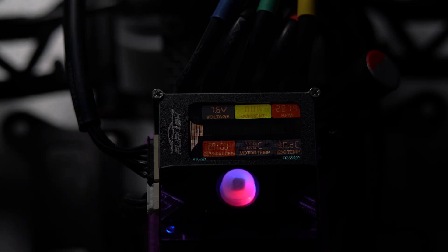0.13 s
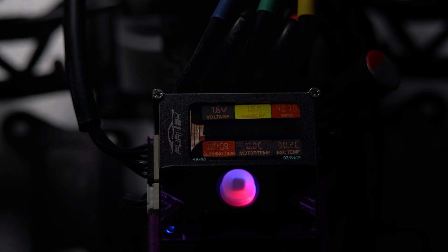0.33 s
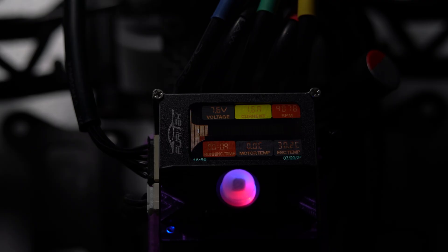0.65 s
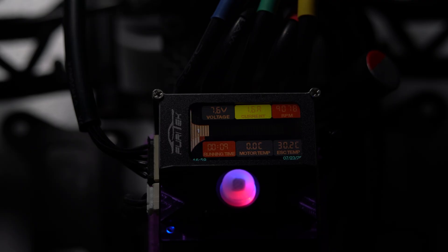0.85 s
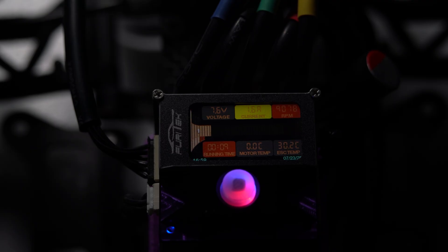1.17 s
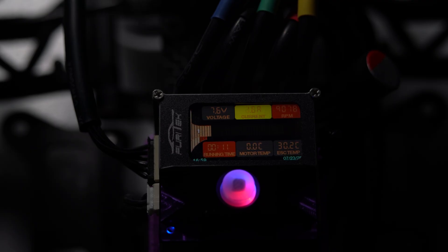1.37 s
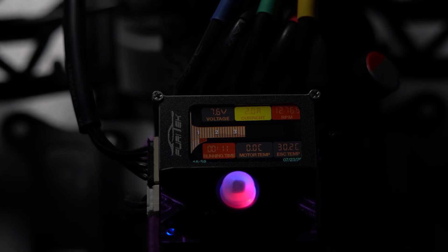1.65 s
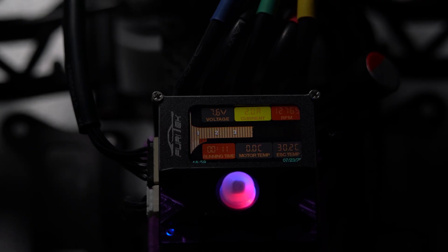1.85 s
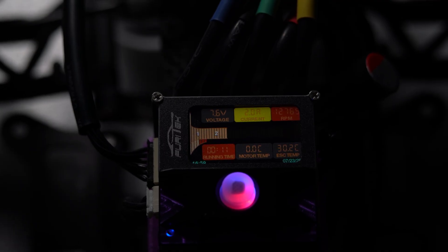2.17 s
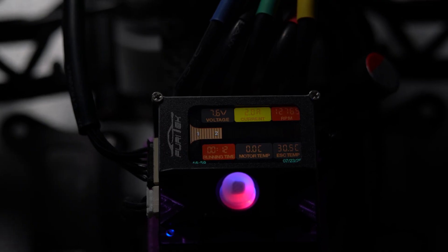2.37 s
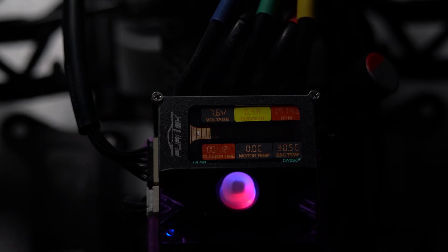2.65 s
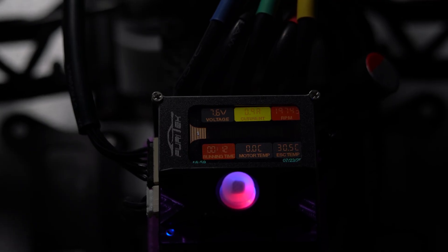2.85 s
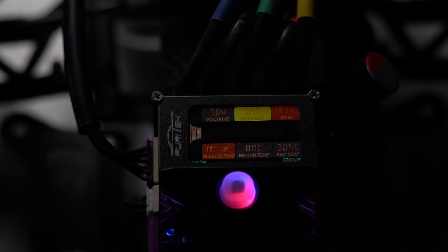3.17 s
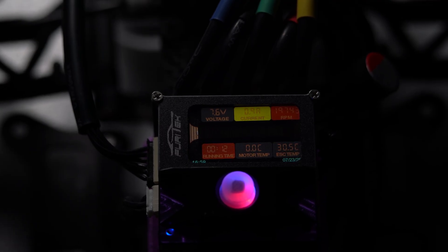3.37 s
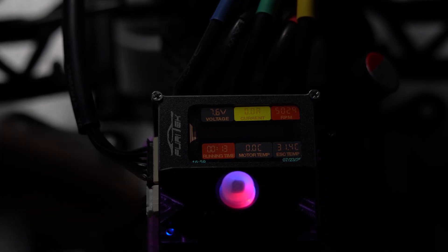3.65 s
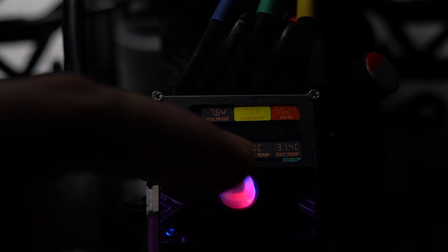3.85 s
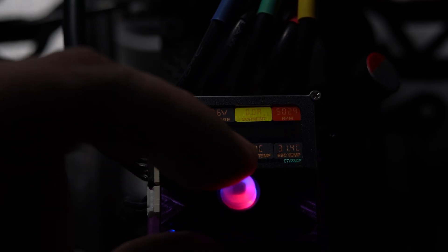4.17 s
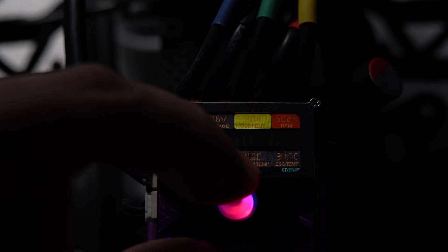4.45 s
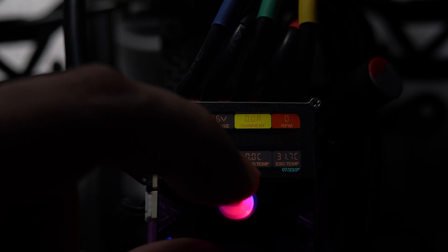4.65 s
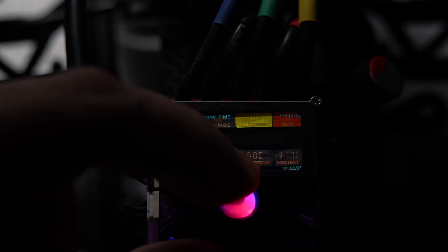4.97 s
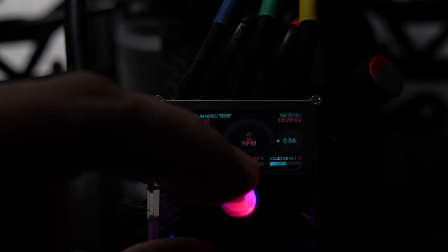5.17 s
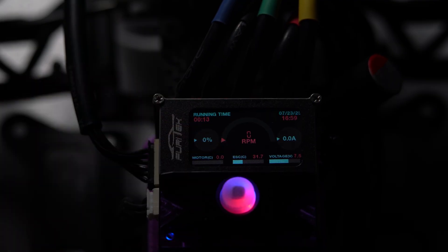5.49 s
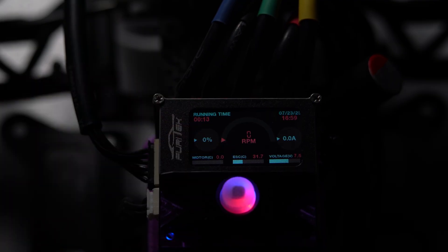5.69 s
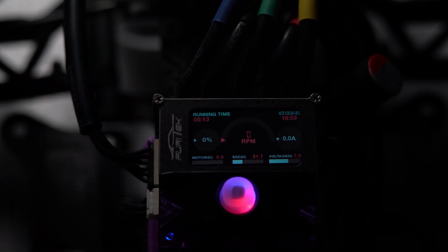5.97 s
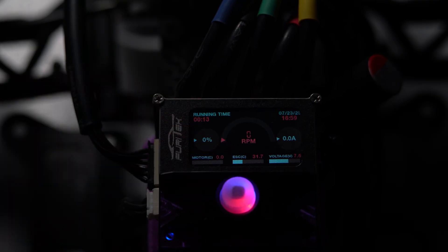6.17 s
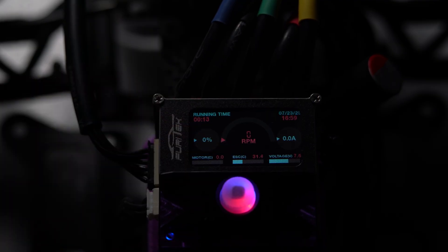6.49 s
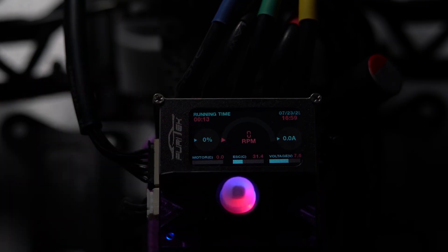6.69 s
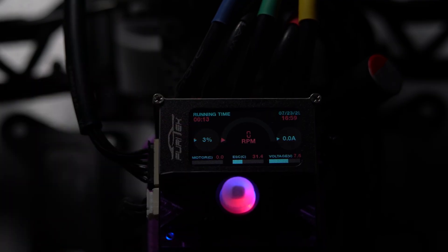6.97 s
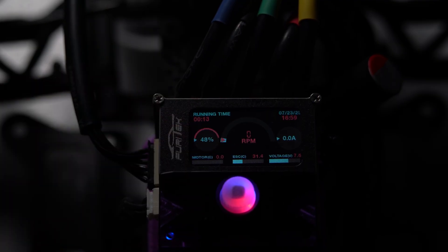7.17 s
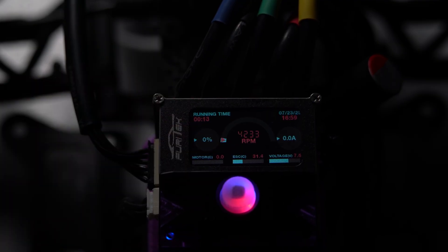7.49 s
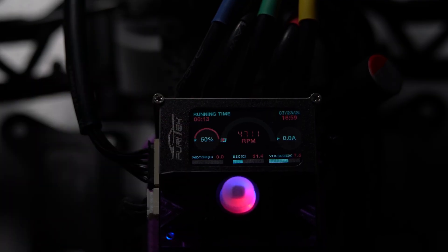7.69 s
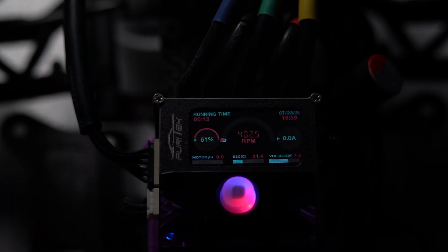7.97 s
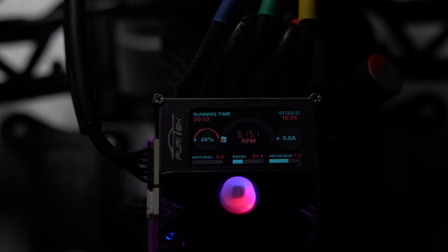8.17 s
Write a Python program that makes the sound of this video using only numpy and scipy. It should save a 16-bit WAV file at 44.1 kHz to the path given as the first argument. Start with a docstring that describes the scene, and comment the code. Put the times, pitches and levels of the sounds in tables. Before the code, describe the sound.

Rattling gears and a small electric motor creep, rev and wind down, followed by faint cooling fan whir and four short whining bursts.

```python
"""A model car's gears chatter on a bench, close to a stereo microphone: its brushless motor creeps up,
revs to a whine and coasts to rest. A tiny cooling fan hisses and whistles while a finger presses the
speed controller; then come four short blips of throttle. Loose gear teeth rattle through the resonances
of gearbox and chassis, and the motor's hum and whine follow multiples (orders) of the shaft speed."""
import sys
import numpy as np
from scipy import signal
from scipy.fft import rfft, irfft, next_fast_len
from scipy.io import wavfile
from scipy.ndimage import uniform_filter1d, map_coordinates

SR = 44100
rng = np.random.default_rng(int(sys.argv[2]) if len(sys.argv) > 2 else 0)


def wrap_up_sound(samples):
    """Save the sound to the file named by the first command line argument, as 16-bit audio."""
    columns = np.atleast_2d(samples).T
    # keep every value between -1 and 1, then stretch to whole-number steps
    tamed = np.clip(columns, -1, 1)
    steps = np.round(tamed * 32767).astype(np.int16)
    wavfile.write(sys.argv[1], SR, steps)


N = 367794
TIME = np.arange(N) / SR
BASS_EDGE_HZ, TOP_HZ = 136, 15780  # so small a car radiates little below the bass edge

# The motor creeps, revs and is braked. Each row: time in seconds, shaft speed in turns a second.
FIRST_RUN = [(0.0, 135.3), (0.08, 135.3), (0.24, 156.0), (0.45, 155.0), (0.59, 173.4), (0.89, 202.0),
             (1.06, 203.3), (1.27, 225.9), (1.33, 253.5), (1.38, 254), (1.42, 272), (1.46, 325),
             (1.53, 525.7), (1.58, 582.7), (1.68, 632.1), (1.81, 653.4), (2.02, 655.6), (2.06, 530),
             (2.1, 415), (2.14, 357), (2.18, 342.9)]
# Blips of throttle. Each row: start and length in seconds, turns a second asked for during the blip
# and after it, load on the gears.
THROTTLE_BLIPS = [(7.053, 0.19, 204, 110, 0.63), (7.549, 0.14, 208, 115, 0.66), (7.9, 0.18, 212, 120, 0.81),
                  (8.261, 0.14, 223, 124, 0.61)]
# How the gears' highest band follows the shaft. A level law lists: dB at full speed, full speed in turns
# a second, dB lost per halving of speed, floor in dB, dB added by load in the creep and in the blips.
SIZZLE_LAW = (-23.5, 405, 11.5, -50.5, 15, 8.5)


def amp(db):
    """Decibels to gain."""
    return 10 ** (np.asarray(db) / 20)


def unit(x):
    """Scale to rms 1."""
    return x / np.sqrt(np.mean(x ** 2) + 1e-20)


def along(points, hz):
    """Interpolate (Hz, value) points on a log axis."""
    freqs, values = np.transpose(points)
    return np.interp(np.log(hz + 1), np.log(freqs + 1), values)


def curves(table):
    """One value per sample for each column after the time."""
    times, *columns = np.transpose(table)
    return [np.interp(TIME, times, column) for column in columns]


def swells(table):
    """Smooth bumps of gain from rows of peak time in seconds, dB, half length in seconds."""
    return sum(amp(db) * np.exp(-.5 * ((TIME - s) / half) ** 2) for s, db, half in table)


def wobble(rate):
    """A smooth random curve, rate knots a second."""
    return map_coordinates(rng.standard_normal(int(N * rate / SR) + 4), [TIME * rate])


def lag(x, lag_s):
    """x followed sluggishly, as by a mass."""
    step = 1 / (lag_s * SR)
    return signal.lfilter([step], [1, step - 1], x)


def filtered(x, response):
    """x through a frequency response."""
    size = next_fast_len(N + SR // 4)
    return irfft(rfft(x, size) * response(np.fft.rfftfreq(size, 1 / SR)), size)[..., :N]


def above(hz, edge_hz):
    """A steep high-pass gain."""
    return np.sqrt(1 - 1 / (1 + (hz / edge_hz) ** 12))


def peak(hz, centre_hz, width_hz):
    """One resonance of height 1."""
    return 1 / (1 + (2 * (hz - centre_hz) / width_hz) ** 2)


def resonances(modes, hz):
    """Gain of (Hz, width Hz, dB) peaks with nothing between them."""
    return sum(amp(db) * peak(hz, centre, width) for centre, width, db in modes)


def lifts(modes, hz):
    """Gain of (Hz, width Hz, dB lift) peaks on a flat response."""
    return amp(sum(db * peak(hz, centre, width) for centre, width, db in modes))


def noise(response):
    """Unrelated mid and side noises of rms 1, coloured by a frequency response."""
    return unit(filtered(rng.standard_normal((2, N)), response))


def rush(spectrum):
    """Noise with a (Hz, dB) spectrum."""
    return noise(lambda hz: amp(along(spectrum, hz)))


def ringing(modes):
    """Noise in (Hz, width Hz, dB) resonances."""
    return noise(lambda hz: resonances(modes, hz))


def partial(angle, flutter_db, rate):
    """A fluttering tone of rms 1, a quarter cycle apart in mid and side."""
    phase = angle + rng.uniform(0, 2 * np.pi)
    return unit(amp(flutter_db * wobble(rate)) * np.array([np.sin(phase), np.cos(phase)]))


def shaft_tones(orders, angle, jitter_rad, jitter_rate, flutter_rate):
    """Tones locked to the shaft by (order, dB) rows, each with its own phase jitter."""
    return sum(amp(db) * partial(order * angle + jitter_rad * wobble(jitter_rate), 3, flutter_rate)
               for order, db in orders)


def body(hz):
    """Gain of the gearbox and chassis."""
    # The broad shape. Each row: frequency in Hz, gain in dB.
    shape = [(30, -49), (100, -39), (230, -26), (560, -20.5), (1100, -26), (1850, -13.5), (2350, -10),
             (3050, -3), (3550, 6.5), (4000, 6.5), (5200, 4), (7300, 3.5), (10500, -5.5), (12500, -6),
             (15600, -13)]
    # The resonances. Each row: centre and width in Hz, lift in dB.
    modes = [(333, 5.3, 12), (427, 18, 13), (669, 48, 7.5), (761, 45, 14), (918, 71, 13.5), (1005, 82, 14),
             (1115, 43, 11), (1214, 130, 8), (1325, 52, 5), (1420, 74, 7.5), (1475, 19, 5), (1633, 67, 5),
             (2065, 42, 4.5), (2100, 100, 2.5), (2221, 64, 10), (2416, 27, 6), (2664, 170, 5.5),
             (4164, 22, 8), (5780, 240, 4.5), (6450, 210, 6), (7330, 1400, 6), (8790, 100, 7.5),
             (9200, 120, 1.5)]
    return amp(along(shape, hz)) * lifts(modes, hz)


def frame_ring(x, t60, ring_db):
    """Countless small parts of the frame ring on after each contact."""
    t = np.arange(SR // 4) / SR
    tail = rng.standard_normal((2, len(t))) * amp(-60 * t / t60)
    echo = signal.fftconvolve(x, tail / np.linalg.norm(tail[0]), axes=1)[:, :N]
    return x + amp(ring_db) * filtered(echo, lambda hz: above(hz, edge_hz=980))


def turning(speed, slowest=12):
    """A gain that fades to silence below the slowest speed, in turns a second."""
    return np.clip(speed / slowest, 0, 1) ** 2


def acceleration(speed):
    """Smoothed change of speed, in turns a second per second."""
    return uniform_filter1d(np.gradient(speed) * SR, size=2000)


def strength(law, speed, loads):
    """Gain from a level law: it grows with speed up to a limit, and with chatter under load."""
    full_db, full_speed, halving_db, floor_db, creep_db, blip_db = law
    halvings = np.maximum(np.log2(full_speed / (speed + 1)), 0)
    free_db = np.maximum(full_db - halving_db * halvings, floor_db)
    return turning(speed) * amp(free_db + creep_db * loads[0] + blip_db * loads[1])


def shaft(stick_speed=11, chatter_speed=139, smooth_speed=354, trigger_s=.02, inertia_s=.065):
    """Shaft speed in turns a second, and the chattering load in the creep and in the blips."""
    friction, drag = 106, .6  # lost each second: turns a second, share of the speed
    release_s, release_speed = FIRST_RUN[-1]
    coast = (release_speed + friction / drag) * np.exp(-drag * (TIME - release_s)) - friction / drag
    driven = TIME < release_s
    run = uniform_filter1d(np.where(driven, curves(FIRST_RUN)[0], coast * (coast > stick_speed)), 900)
    asked, load = np.zeros((2, N))
    for s, length, top, after, blip_load in THROTTLE_BLIPS:
        asked = np.where(TIME < s, asked, np.where(TIME < s + length, top, after))
        load = np.where(TIME < s, load, blip_load)
    # the throttle lags behind the finger, the shaft behind the throttle
    blips = lag(lag(asked, trigger_s), inertia_s)
    # a kick only bites once the shaft is under way
    kick = np.clip(1 - blips / (asked + 1), 0, 1) * turning(blips, slowest=210)
    speed = np.abs(run + blips)
    chatter = np.clip((smooth_speed - speed) / (smooth_speed - chatter_speed), 0, 1)
    return speed, chatter * lag(np.array([driven, load + kick]), lag_s=0.00081)


def fan(swell_start_s=4.48, hiss_db_per_s=3.5, low_db_per_s=2.5):
    """The cooling fan's hiss and thin drifting whistle, heard louder in the second half."""
    # The whistle. Each row: time in seconds, pitch in Hz, level in dB.
    whistle_path = [(3.0, 3168, -68), (3.9, 3168, -57), (4.37, 3176, -63), (4.7, 3208, -54.5),
                    (4.96, 3229, -50.5), (5.15, 3233, -50.5), (5.38, 3237, -47), (5.52, 3245, -56),
                    (5.63, 3260, -52), (5.73, 3276, -56), (5.92, 3305, -53), (6.05, 3322, -58),
                    (6.25, 3358, -53), (6.42, 3375, -55), (6.6, 3380, -51.5), (7.04, 3368, -56.5)]
    # Its overtones swell in the housing. Each row: level in dB, resonance and width in Hz, lift in dB.
    overtones = [(-66, 6380, 110, 12), (-68, 9670, 160, 12)]
    # The hiss and the low rush of air. Each row: frequency in Hz, relative level in dB.
    hiss_spectrum = [(880, -48), (1500, -27), (2220, -10.5), (3080, -15.5), (3270, -10.5), (3570, -5),
                     (3880, -3), (4150, -1.5), (4550, -0.5), (4850, -4.5), (5400, -5.5), (6200, -8),
                     (7260, -4.5), (8660, -10), (9750, -8), (12100, -14), (13600, -9.5), (15800, -15)]
    low_spectrum = [(15, -64), (25, -36), (70, -31), (96, -31), (129, -12.5), (221, -16.5), (294, -6),
                    (417, -9.5), (772, -6), (1200, -7), (2500, -5.5), (3250, -6.5), (5500, -120)]
    swell_s = np.maximum(TIME - swell_start_s, 0)
    pitch, whistle_db = curves(whistle_path)
    angle = 2 * np.pi * np.cumsum(pitch + 2 * wobble(25)) / SR
    overtones_db = [db + lift * peak(k * pitch, hz, width)
                    for k, (db, hz, width, lift) in enumerate(overtones, 2)]
    # the whistle wavers more toward the end
    whistle = sum(amp(db) * partial(k * angle, flutter_db=1.2 + swell_s, rate=16)
                  for k, db in enumerate([whistle_db] + overtones_db, 1))
    air = unit(frame_ring(rush(hiss_spectrum), t60=0.11, ring_db=-4.5)) * amp(0.49 * wobble(50))
    hiss = amp(-45.5 + hiss_db_per_s * swell_s) * air
    low_air = amp(-59.5 + low_db_per_s * swell_s) * rush(low_spectrum)
    return hiss + low_air + whistle


def finger(boom_hz=420, width_hz=90):
    """A fingertip rubs on the controller, and the chassis booms softly under it."""
    # Each row: peak time in seconds, level in dB, half length in seconds, boom against the rub in dB.
    presses = [(4.444, -52.5, 0.017, -26), (4.675, -56, 0.094, -5.5), (5.067, -55.5, 0.1, -4.5)]
    # Rubbing skin. Each row: frequency in Hz, relative level in dB.
    skin_spectrum = [(25, -65), (100, -22), (300, -6.5), (900, -1), (1700, 0), (3000, -4), (8000, -32)]
    skin = rush(skin_spectrum)
    boom = unit(filtered(rush(skin_spectrum), lambda hz: peak(hz, boom_hz, width_hz)))
    rubs = sum(swells([bump]) * (skin + amp(boom_db) * boom) for *bump, boom_db in presses)
    return rubs * amp(1.1 * wobble(60))


def rocking(speed, angle, sway_hz=200, width_hz=170):
    """The magnets tug twice and four times a turn; the chassis sways when either meets its own note."""
    twice, four_times = (partial(order * angle, flutter_db=2, rate=20) for order in (2, 4))
    tugs = amp(-65) * turning(speed) * (twice + amp(-10) * four_times)
    return filtered(tugs, lambda hz: above(hz, BASS_EDGE_HZ) * peak(hz, sway_hz, width_hz))


def jolts():
    """A sudden change of torque makes the chassis ring and boom."""
    # Each row: peak time and half length in seconds, ring and boom levels in dB.
    shudders = [(2.09, 0.035, -56, -48), (3.68, 0.04, -60, -61), (3.823, 0.06, -61, -60),
                (7.14, 0.04, -45, -66), (7.61, 0.025, -39, -66)]
    # Chassis resonances. Each row: centre and width in Hz, relative level in dB.
    ring_modes = [(950, 110, 0), (1450, 110, -12)]
    boom_modes = [(150, 43, -12), (337, 30, -6.5), (434, 56, 1), (760, 46, -1)]
    rings = swells([(s, ring_db, half) for s, half, ring_db, _ in shudders])
    booms = swells([(s, boom_db, half) for s, half, _, boom_db in shudders])
    return rings * ringing(ring_modes) + booms * ringing(boom_modes)


def rubbing(rough_db=2.5):
    """The slow drivetrain rubs in ringing swells, and its slack teeth rattle just before it stops."""
    # Rubs and last rattle. Each row: peak time in seconds, level in dB, half length in seconds.
    scrapes = [(0.12, -33.5, 0.15), (2.58, -51, .05), (2.83, -38, 0.075), (3.134, -40.5, 0.095),
               (3.323, -44, 0.066), (3.53, -47, 0.089), (7.3, -38, 0.087), (7.71, -38, 0.06),
               (8.05, -36, 0.08), (8.32, -34, 0.03)]
    last_turns = [(3.77, -50, 0.06)]
    # Their resonances. Each row: centre and width in Hz, relative level in dB.
    scrape_modes = [(2237, 124, -3), (2700, 74, -10), (3830, 310, -8.5), (4190, 120, -6.5)]
    slack_modes = [(2820, 330, -1), (3550, 80, -2), (3740, 90, 0)]
    rubs = swells(scrapes) * ringing(scrape_modes) + swells(last_turns) * ringing(slack_modes)
    return rubs * unit(amp(rough_db * wobble(90)))


def coasting(speed, angle, release_db=-35, halving_db=13):
    """Freewheeling gears sing in whines that flare as they fall through the gear case's resonances."""
    # The whines. Each row: shaft order, relative level in dB.
    orders = [(7, -2), (8, -3), (11, 3), (13, -3), (15, 6), (17, -2)]
    # The gear case. Each row: centre and width in Hz, gain in dB.
    case_modes = [(2170, 200, -3.5), (3730, 260, 0), (4150, 240, -4.5)]
    release_s, release_speed = FIRST_RUN[-1]
    free = np.clip((TIME - release_s) / .04 + 2.5, 0, 1) * (TIME < THROTTLE_BLIPS[0][0])
    level = free * turning(speed) * amp(release_db - halving_db * np.log2(release_speed / (speed + 1)))
    whines = shaft_tones(orders, angle, jitter_rad=.45, jitter_rate=120, flutter_rate=50)
    return filtered(level * whines, lambda hz: resonances(case_modes, hz))


def tinks(speed, loads, tinks_per_s=14, t60=0.031):
    """The chatter shakes a small loose steel part, which rings briefly and very high."""
    # The loudest tinks; lesser ones fall at random. Each row: start in seconds, level in dB.
    loudest = [(0.277, -22), (0.333, -23), (0.443, -21), (0.468, -18), (7.602, -26), (7.695, -20),
               (7.79, -31), (7.908, -26), (8.053, -24), (8.313, -23)]
    # The steel's modes. Each row: frequency in Hz, relative level in dB.
    steel_modes = [(11250, -1), (11900, 0), (12350, -3), (12800, -2), (13300, -15)]
    shaken = (rng.random(N) < tinks_per_s / SR) * loads.sum(axis=0)
    shaken *= strength(SIZZLE_LAW, speed, loads) * amp(2 + 2 * rng.standard_normal(N))
    for s, db in loudest:
        shaken[round(s * SR)] = amp(db)
    t = np.arange(SR // 20) / SR
    out = np.zeros((2, N + len(t)))
    for start in np.flatnonzero(shaken > amp(-50)):
        tink = sum(amp(db + rng.normal(0, 3))
                   * np.sin(2 * np.pi * (hz * rng.normal(1, .008) * t + rng.random((2, 1))))
                   for hz, db in steel_modes)
        out[:, start:start + len(t)] += shaken[start] * unit(tink) * amp(-60 * t / t60)
    return out[:, :N]


def judder(speed, loads, creep_db=-38.5, blip_db=-31.5, rough_db=2.5):
    """Loaded at low speed, the drivetrain gives a rough, ringing rasp."""
    # Its resonances. Each row: centre and width in Hz, relative level in dB.
    modes = [(960, 90, -10.5), (2110, 70, -8), (2245, 71, 2.5), (2350, 72, -3.5), (2734, 70, -1)]
    level = (amp([creep_db, blip_db]) @ loads) * turning(speed, slowest=172)
    return level * unit(ringing(modes) * amp(rough_db * wobble(70)))


def clacks(t60=0.033, gain_db=-9, bright_hz=7000):
    """Teeth cross their backlash with bright clicks as the shaft stops and in the first three blips."""
    # Each row: start in seconds, relative level in dB.
    hits = [(3.7654, -30), (3.7878, -29), (3.8172, -32), (7.206, -12), (7.655, -12), (7.978, -8.5)]
    bursts = sum(amp(db - 60 * np.abs(TIME - s) / t60) * (TIME >= s) for s, db in hits)
    return amp(gain_db) * bursts * noise(lambda hz: body(hz) * np.hypot(1, hz / bright_hz))


def motor(speed, angle, loads, settle_rate=1500, gear_ratio=2.835, plate_hz=762, foot_hz=140):
    """Unbalance hums; buzz and whine swell as they sweep through resonances of mount, can and chassis."""
    # Level laws of hum, buzz and whine, listed like SIZZLE_LAW.
    hum_law = (-47.5, 426, 13, -90, 3.5, 12)
    buzz_law = (-39, 650, 9, -68, 21, 6)
    whine_law = (-36, 658, 18, -90, 23, 33)
    # Cogging buzz and magnet whine. Each row: shaft order, relative level in dB.
    buzz_orders = [(2, -18.5), (3, -13), (4, -19), (5, -13.5), (6, -17), (7, -14), (8, -11), (10, -7),
                   (11, -12)]
    whine_orders = [(4, -5), (7, -6.5), (8, 0), (9, -7), (10, -11), (11, -6.5), (13, -7), (14, -3),
                    (15, -5), (22, -5)]
    # The motor's mount and can. Each row: centre and width in Hz, lift in dB.
    mount_modes = [(415, 50, 2), (610, 30, 3), (660, 40, 4), (760, 40, 7), (950, 40, 3), (1020, 55, 11)]
    can_modes = [(3850, 450, 5), (4450, 260, 6), (5050, 170, -12)]
    buzz = shaft_tones(buzz_orders, angle, jitter_rad=.3, jitter_rate=90, flutter_rate=22)
    buzz *= strength(buzz_law, speed, loads)
    # the mount passes only the low part of the cogging
    buzz = filtered(buzz, lambda hz: lifts(mount_modes, hz) * (1 - above(hz, edge_hz=2400) ** 2))
    # the rotor shivers in its bearings, which frays the whine
    whine = shaft_tones(whine_orders, angle, jitter_rad=.4, jitter_rate=260, flutter_rate=60)
    whine = filtered(whine, lambda hz: lifts(can_modes, hz))
    # clean tones only stand out while the speed changes slowly
    settled = 1 / (1 + (acceleration(speed) / settle_rate) ** 2)
    whine = filtered(settled * strength(whine_law, speed, loads) * whine, body)
    # near full speed the geared-down shaft adds a lower note and the chassis plate rings
    fast = np.clip(speed / 650, 0, 1) ** 4
    low_note = amp(-14) * partial(angle / gear_ratio, flutter_db=-1, rate=20)
    plate = amp(-2) * ringing([(plate_hz, 25, 0)])
    # play in the bearings roughens the hum, most while the speed changes or the throttle kicks
    play = (.3 + .6 * (1 - settled) + .4 * loads[1]) * wobble(110)
    unbalance = (0.76 + 0.29 * settled) * partial(angle + play, flutter_db=3, rate=40)
    hum = strength(hum_law, speed, loads) * (unbalance + fast * (low_note + plate))
    # the car bounces on its feet at one low note
    bass = filtered(hum + buzz, lambda hz: above(hz, BASS_EDGE_HZ) * lifts([(foot_hz, 30, 3)], hz))
    return whine + bass


def scream(speed, angle, loads, smear_hz=1050, strain_db=9.5, strain_rate=3100, braking_share=0.19):
    """Backlash jitters the tooth rate into gliding bands, loudest while the speed changes fast."""
    # The meshing teeth. Each row: shaft order, relative level in dB.
    mesh_orders = [(15, -15), (19, -14.5), (27, 1.5), (55, 0.5)]
    rate = acceleration(speed)
    strain = np.abs(rate) * np.where(rate > 0, 1, braking_share) / strain_rate
    # The level law, listed like SIZZLE_LAW.
    law = (-32, 435, 10.5, -90, 11, 5.5)
    level = strength(law, speed, loads) * amp(strain_db * np.sqrt(strain))
    bands = np.zeros((2, N))
    for order, db in mesh_orders:
        in_range = np.clip((TOP_HZ - order * speed) / 1000 + 1, 0, 1)
        for wave in (np.sin, np.cos):
            jitter = noise(lambda hz: np.exp(-.5 * (hz / smear_hz) ** 2))
            bands += amp(db) * in_range * jitter * wave(order * angle)
    return level * bands


def gears(speed, angle, loads, contacts_per_turn=42, spread_db=2.5, slide_db=-2, runout=0.18):
    """Loose teeth strike at random, harder once a turn, and slide in between."""
    # Level laws of the three bands under the sizzle, low to high, listed like SIZZLE_LAW.
    knock_law = (-43, 327, 6.5, -54, 13.5, 15)
    whirr_law = (-38.5, 419, 4.5, -63, 11.5, 13)
    rasp_law = (-25.5, 337.5, 7.5, -47.5, 12.5, 8)
    struck = rng.random(N) < contacts_per_turn * speed / SR
    sizes = amp(spread_db * np.clip(rng.standard_normal(N), -2, 2))
    strikes = unit(struck * sizes * rng.choice([-1, 1], (2, N)))
    force = (strikes + amp(slide_db) * rng.standard_normal((2, N))) * (1 + runout * np.cos(angle))
    # speed and load set the level, however dense the strikes are
    force /= np.sqrt(np.abs(uniform_filter1d(force ** 2, size=4000)))
    # bending waves carry treble faster than bass, spreading each strike over a few milliseconds
    bent = filtered(force, lambda hz: np.exp(-2j * np.sqrt(hz)))
    case = filtered(frame_ring(bent, t60=0.12, ring_db=-8), body) * amp(0.64 * wobble(45))
    over_knock, over_whirr, over_rasp = (filtered(case, lambda hz: above(hz, edge_hz) ** 2)
                                         for edge_hz in (1780, 2850, 9500))
    bands = [(knock_law, case - over_knock), (whirr_law, over_knock - over_whirr),
             (rasp_law, over_whirr - over_rasp), (SIZZLE_LAW, over_rasp)]
    return sum(strength(law, speed, loads) * unit(band) for law, band in bands)


def scene(side_trim_db=-1.5):
    """The car on its bench, summed as mid and side and spread over a close pair of microphones."""
    # Stereo width. Each row: frequency in Hz, side against mid in dB before the trim.
    width = [(60, -10), (110, -23), (200, -36), (380, -15), (700, -5.5), (1290, -5.5), (2380, -1.5),
             (4400, -3.5), (8120, -1), (15000, -1)]
    # Balance. Each row: frequency in Hz, left against right in dB.
    balance = [(60, -3), (110, 1), (200, -0.5), (380, -0.5), (700, -1.5), (1290, -1), (2380, -3),
               (4400, -1.5), (8120, -5.5), (15000, -1)]
    speed, loads = shaft()
    angle = 2 * np.pi * np.cumsum(speed + 0.599 * wobble(30)) / SR
    drive = gears(speed, angle, loads) + scream(speed, angle, loads) + motor(speed, angle, loads)
    drive += rocking(speed, angle) + coasting(speed, angle)
    rattles = rubbing() + jolts() + tinks(speed, loads) + judder(speed, loads) + clacks()
    mid, side = drive + rattles + fan() + finger()
    side = filtered(side, lambda hz: amp(along(width, hz) + side_trim_db))
    left_right = np.array([mid + side, mid - side])
    return filtered(left_right, lambda hz: amp(np.outer([.5, -.5], along(balance, hz))))


def record(dry):
    """The microphones pass nothing above TOP_HZ."""
    return filtered(dry, lambda hz: hz < TOP_HZ)


dry = scene()
out = record(dry)
wrap_up_sound(out)
```